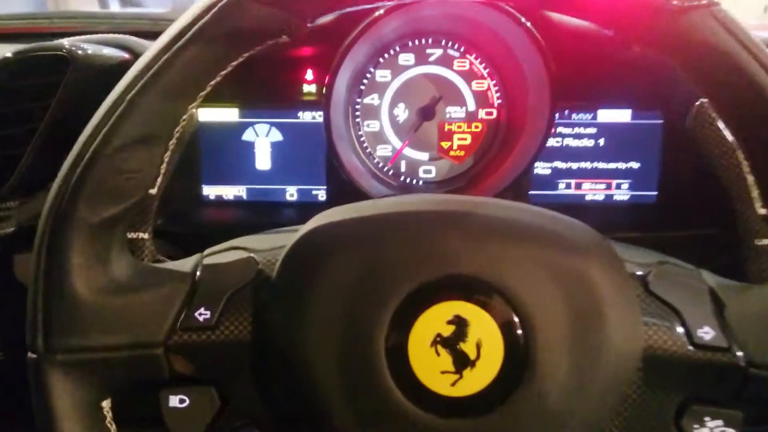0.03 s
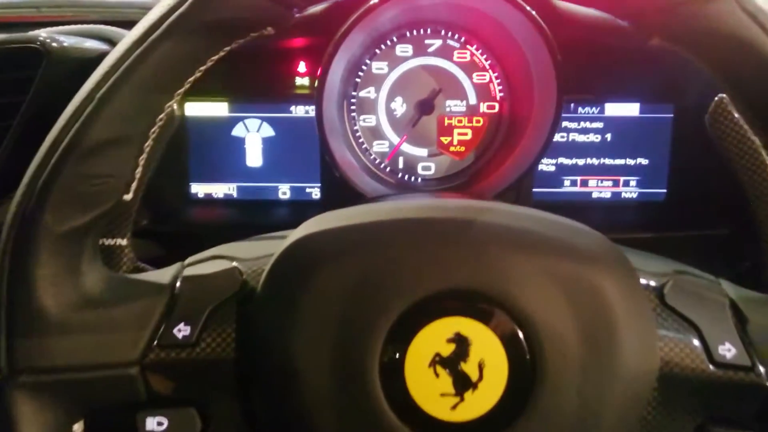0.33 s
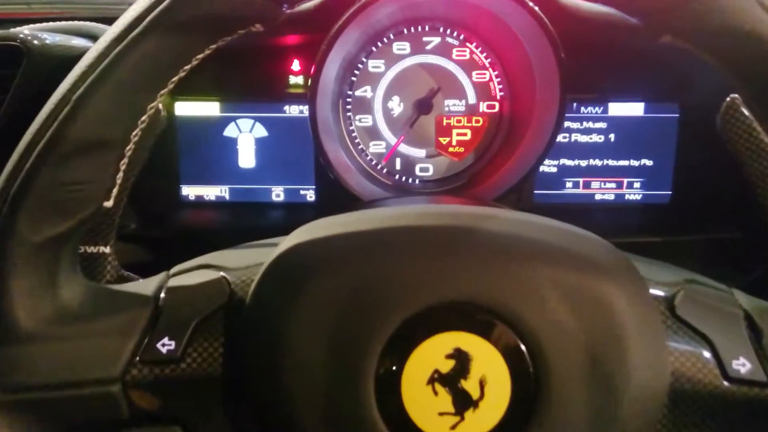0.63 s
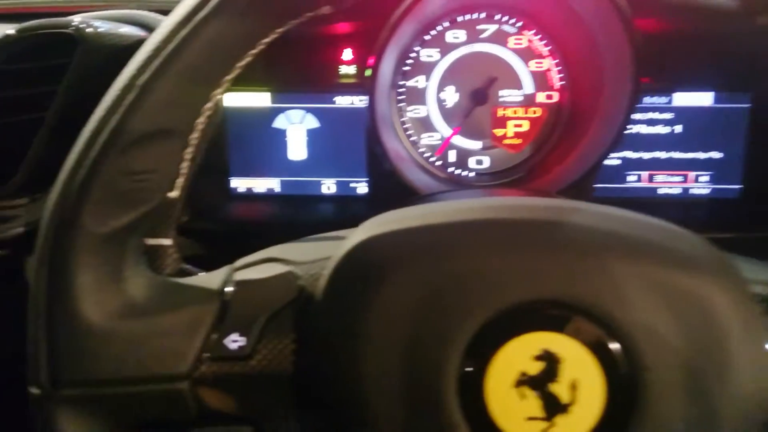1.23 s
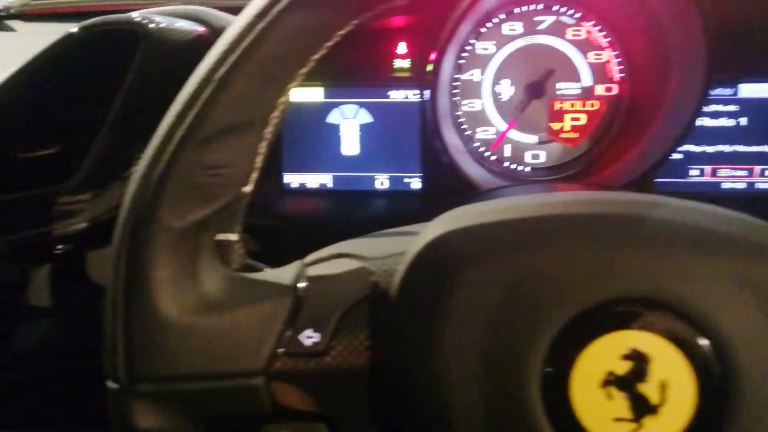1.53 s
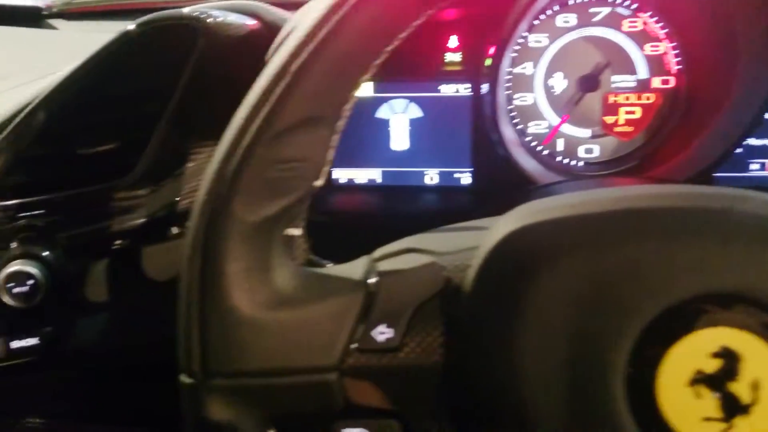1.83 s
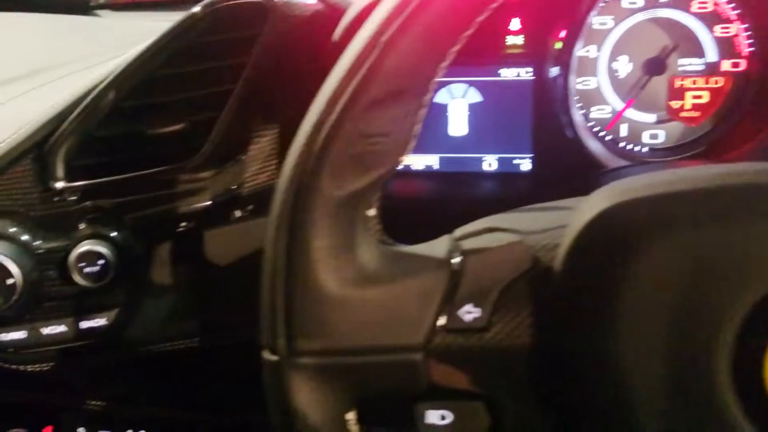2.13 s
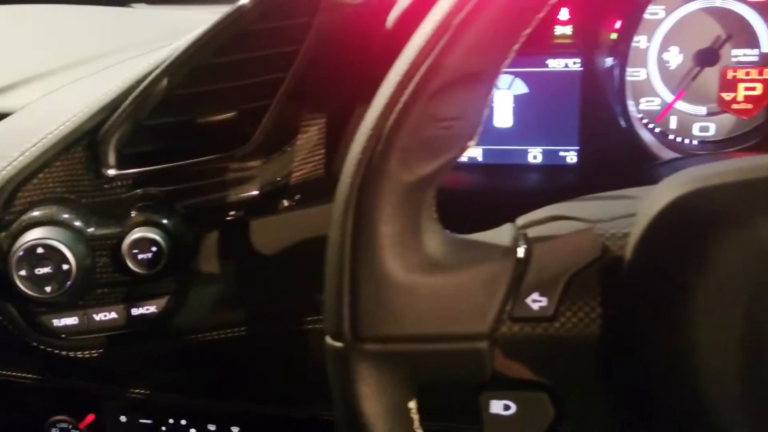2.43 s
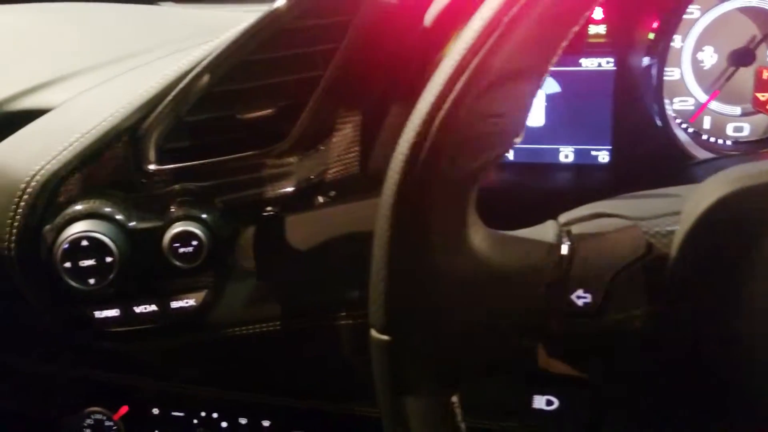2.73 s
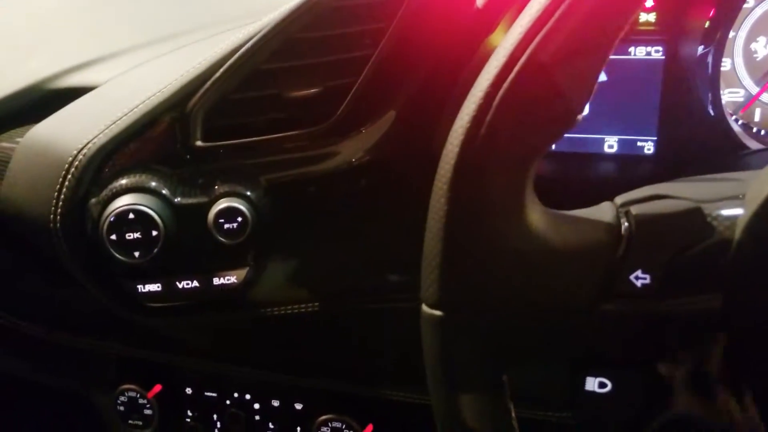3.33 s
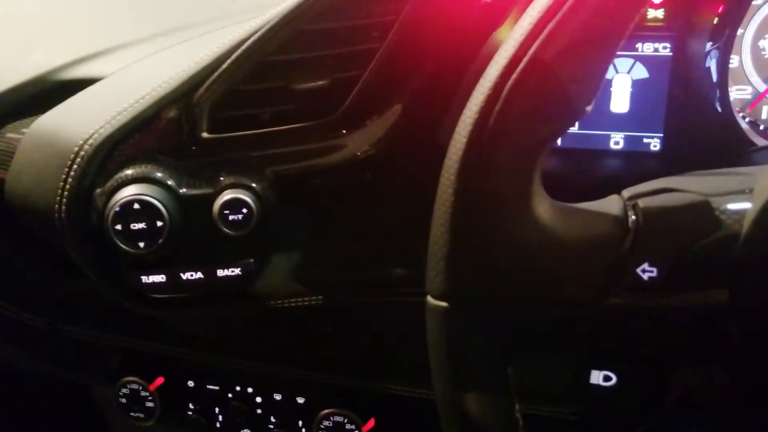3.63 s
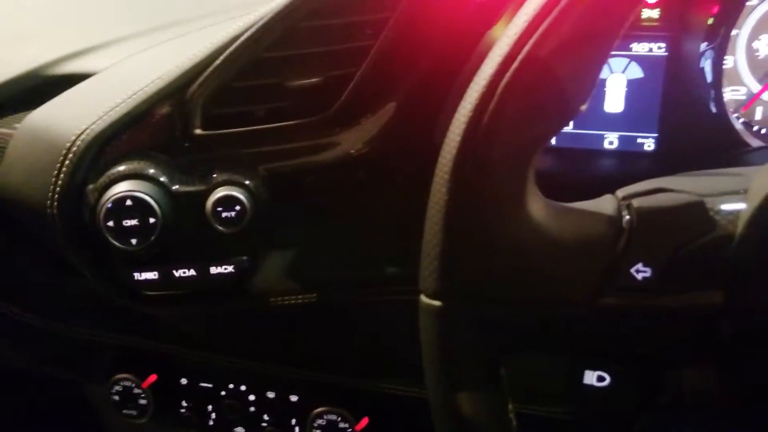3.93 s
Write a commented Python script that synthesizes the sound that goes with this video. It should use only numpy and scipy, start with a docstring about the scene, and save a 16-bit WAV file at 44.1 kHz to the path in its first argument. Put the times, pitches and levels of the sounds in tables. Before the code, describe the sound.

Deep engine idle inside a parked sports car, with ventilation hiss and faint handling noises.

```python
"""Inside a parked sports car. From the start its V8 idles with a deep, slightly unsteady boom, while
machinery whirrs and air hisses from the vents. Just past halfway the idle rises and settles with a deep
shudder, and something rustles, squeaks and ticks softly as the hand-held microphone turns. Near the end
the microphone takes a dull bump. Throughout, the engine's bass swings nearly opposite ways in the left
and right channels."""
import sys
import numpy as np
from scipy import signal
from scipy.fft import rfft, irfft
from scipy.io import wavfile

SR = 44100
rng = np.random.default_rng(int(sys.argv[2]) if len(sys.argv) > 2 else 0)


def unload_audio(sound):
    """Save the sound as a 16-bit wav file, at the path given as the first command line argument."""
    columns = np.transpose(np.atleast_2d(sound))
    # keep every value between -1 and 1, then stretch to whole-number steps
    steps = np.round(np.clip(columns, -1, 1) * 32767)
    wavfile.write(sys.argv[1], SR, steps.astype(np.int16))


N = 176400

# idle speed; the cabin booms more as it sinks: t/s, firing rate/Hz, boost of the firing tone/dB
IDLE_SPEED = [(0, 90.3, .8), (.37, 89.8, 1), (.5, 91.15, 0.5), (.65, 89.9, 1.6), (.95, 89.75, 1),
              (1.14, 91.4, 0.2), (1.37, 89.95, 0), (1.45, 91.46, -0.5), (1.74, 92, -3), (1.86, 89, -1.2),
              (2.03, 88.7, -0.8), (2.22, 89.4, -1.2), (2.44, 95.56, -7), (2.56, 91.57, -2.5),
              (2.66, 94.2, -4.9), (2.84, 92.55, -4), (2.97, 88.7, -2.2), (3.09, 90.5, -1.2),
              (3.23, 91.2, -3), (3.6, 89.35, -1.6), (3.77, 90.34, -1.8), (3.93, 89.2, -1), (4.0, 89.5, -2)]
# engine tones: multiple of the engine cycle, left base level/dB, right base level/dB
ENGINE_TONES = [(4, -33, -33), (5, -42, -42), (6, -40, -39), (8, -16, -12), (9, -41, -38), (10, -38, -35),
                (12, -44, -42), (13, -52, -49), (14, -38, -35.5), (17, -48, -45), (18, -41.5, -36),
                (20, -42.5, -37.5), (22, -49, -45.5), (23, -55, -52), (24, -45, -44), (26, -58, -55),
                (28, -42.5, -41), (30, -54, -48), (31, -53, -47.5), (32, -59, -47.5), (34, -50, -51),
                (36, -58, -49.5), (40, -62, -57), (48, -66, -54), (52, -69, -59)]
# the tone an octave above the firing tone: t/s, left level/dB, right level/dB
OCTAVE_LEVELS = [(0, -28.5, -38), (.4, -32, -45), (.55, -28, -34), (.7, -32, -32.5), (.93, -32.5, -28.5),
                 (1.08, -34, -52), (1.2, -27, -30), (1.4, -30, -39), (1.5, -28.5, -36),
                 (1.83, -26.5, -26.5), (1.92, -36, -31.5), (2.03, -22.5, -22), (2.2, -27.5, -27.5),
                 (2.28, -30, -37.5), (2.58, -33.5, -29.5), (2.8, -36, -54), (2.91, -29, -27),
                 (3.16, -33, -36), (3.28, -24, -24.5), (3.68, -31, -35.5), (3.9, -28.5, -28),
                 (4.0, -27, -27)]
# how far the left channel's bass is shifted against the right: f/Hz, phase/rad
BASS_PHASE = [(45, 3), (68, 3.05), (90, 2.713), (160, 2.77), (185, 2.806), (240, 2.53), (320, 2.55),
              (400, 2.41)]
# engine and body rumble: f/Hz, base level/dB per Hz
RUMBLE_SPECTRUM = [(10, -85), (30, -83), (52, -59), (75, -60), (125, -79), (190, -56), (280, -70.5),
                   (370, -66.5), (500, -78.5), (900, -105)]
# swells of deep shudder: t/s, half length/s, f/Hz, right level/dB
SHUDDER_SWELLS = [(2.45, .08, 48.3, -27), (2.78, 0.099, 53.2, -19), (2.95, 0.07, 43, -20)]
# soft rustles: t/s, half length/s, centre f/Hz, width/octaves, left base level/dB, right base level/dB
RUSTLE_STROKES = [(2.493, 0.024, 2800, 0.5, -55, -40), (2.82, 0.04, 2920, 0.5, -49, -40.5),
                  (2.888, 0.29, 2200, 0.52, -53, -38.5), (2.913, 0.2, 7460, 0.3, -49.5, -51),
                  (3.49, 0.08, 8390, 0.33, -45.5, -47), (3.54, 0.03, 13500, 0.25, -56, -51)]
# faint squeaks: t/s, half length/s, f/Hz, right base level/dB
SQUEAK_SLIPS = [(2.685, .014, 2870, -34.5), (2.715, 0.02, 2940, -35), (2.742, .018, 2870, -35),
                (2.805, .03, 2830, -41), (2.835, .018, 3370, -39), (2.84, .018, 2400, -37)]
# faint ticks: t/s, centre f/Hz, width/octaves, decay/s, right level/dB
TICK_HITS = [(1.056, 4370, .09, 0.0047, -29), (2.4455, 7498, .3, .0015, -32), (2.476, 3250, .1, .003, -29),
             (2.479, 2600, .3, .002, -25), (2.4826, 3100, 0.47, .002, -25),
             (2.4885, 4080, 0.16, .0015, -27.5), (2.492, 4020, .3, 0.0016, -26),
             (2.501, 3000, .3, 0.0033, -31), (2.975, 4000, .06, 0.0054, -29), (3.047, 4100, .25, .003, -28),
             (3.522, 3500, 0.36, .003, -28)]
# soft thuds of the hand: t/s, level/dB
HAND_THUDS = [(2.485, -31.5), (2.88, -39), (3.045, -40)]
# the machinery's two resonances: t/s, right whirr level/dB, right ring level/dB
MACHINE_LEVELS = [(0, -49, -54), (.6, -49.5, -46), (.85, -51, -48), (1.42, -44.5, -42.5), (1.7, -44.5, -50),
                  (2.05, -49, -45), (2.3, -47.5, -53), (3.08, -49, -45.5), (3.3, -52, -53), (4.0, -59, -47)]
# air from the vents: f/Hz, left base level/dB per Hz, right base level/dB per Hz
AIR_SPECTRUM = [(199, -95, -66.5), (533, -79, -72), (695, -79, -71.5), (1120, -81.5, -70.5),
                (1580, -82, -70.5), (2580, -84, -72.5), (3200, -85.5, -72), (3640, -83.5, -71),
                (4350, -81, -75), (4640, -78.5, -74), (6020, -77, -82), (7460, -83, -84.5),
                (9300, -80.5, -87.5), (10030, -85.5, -83), (11170, -98, -85.5), (14900, -111, -87.5)]
# pitches at which the air ducts ring: f/Hz, width/Hz, left boost/dB, right boost/dB
DUCT_PEAKS = [(874, 154, 3.5, 3), (1290, 63, 3.5, 4), (1864, 79, 0.5, 4), (2136, 170, 0, 3.5),
              (2740, 57, 5, 2), (14680, 60, 0, 1)]
# faint whistles: t/s, half length/s, f/Hz, width/Hz, right level/dB
WHISTLE_SWELLS = [(0.195, 0.24, 1380, 71.2, -45.5), (0.6, 1.0, 570.6, 80, -51),
                  (3.94, 0.095, 1291, 45.2, -44)]

CYLINDERS = 8
SPEED_JITTER, BOOM_WAVER_DB, TONE_WAVER, WAVER_HZ = .002, 0.37, 0.185, 4.4
# overtones and rumble weaken as the microphone turns away
OVERTONE_START_DB, OVERTONE_FADE_DB_PER_S, RUMBLE_FADE_DB_PER_S = 1, 0.57, 0.4
RUMBLE_APART, RUMBLE_APART_HZ = 0.51, 198  # the channels grow less alike as the pitch goes up
BUMP_AT_S, BUMP_SAG_S, BUMP_PEAK_S = 3.942, 0.0051, 0.008
BUMP_START_HZ, BUMP_END_HZ, BUMP_GAIN = 190, 60, 0.63
AIR_SHARED, AIR_LEFT_LEAD_S = 0.17, 0.000556  # a little air noise reaches both channels, the left first
CABIN_RIPPLE_DB, CABIN_RIPPLE_HZ = 1.63, 30.07  # size and spacing of the cabin's random peaks and dips


def engine():
    """Firing cylinders make a deep tone and its octave; their unevenness adds weaker, wavering tones."""
    firing_hz, boom_db = curves(IDLE_SPEED)
    unsteady_hz = firing_hz * (1 + SPEED_JITTER * drift(rate_hz=17.5).real)
    cycle_angle = 2 * np.pi * np.cumsum(unsteady_hz) / SR / CYLINDERS  # each cylinder fires once a cycle
    boom = amp(boom_db + BOOM_WAVER_DB * drift(WAVER_HZ).real)
    main_gains = {CYLINDERS: boom, 2 * CYLINDERS: 1}
    overtone_fade = amp(OVERTONE_START_DB - OVERTONE_FADE_DB_PER_S * clock())
    octave = (2 * CYLINDERS, *curves(OCTAVE_LEVELS))
    out = np.zeros((2, N))
    for multiple, left_db, right_db in ENGINE_TONES + [octave]:
        waver = 1 + TONE_WAVER * drift(WAVER_HZ).real
        gain = main_gains.get(multiple, overtone_fade * waver)
        tone = np.sqrt(2) * gain * np.exp(1j * (multiple * cycle_angle + 2 * np.pi * rng.random()))
        left = tone * left_shift(multiple * firing_hz.mean() / CYLINDERS)
        out += [amp(left_db) * left.real, amp(right_db) * tone.real]
    return out


def rumble(left_db=-3.5):
    """Uneven low engine noise fills the cabin; both channels share its deepest part."""
    shared, own = rfft(rng.standard_normal((2, N))) * density(*np.transpose(RUMBLE_SPECTRUM))
    apart = np.clip(RUMBLE_APART * (bins() / RUMBLE_APART_HZ) ** 2, 0, 1)
    left = amp(left_db) * (np.sqrt(1 - apart ** 2) * shared * left_shift(bins()) + apart * own)
    fade = amp(RUMBLE_FADE_DB_PER_S * (clock().mean() - clock()))
    return irfft(np.array([left, shared]), N) * fade


def shudder(left_db=-2):
    """Deep swells while the idle rises and settles, swinging opposite ways left and right."""
    swells = sum(swell(*row) for row in SHUDDER_SWELLS)
    return np.array([-amp(left_db) * swells, swells])


def bump(right_db=-19):
    """A dull knock beside the left microphone; its pitch drops as the push relaxes."""
    age = np.maximum(clock() - BUMP_AT_S, 0)
    hz = BUMP_END_HZ + (BUMP_START_HZ - BUMP_END_HZ) * np.exp(-age / BUMP_SAG_S)
    push = age / BUMP_PEAK_S * np.exp(1 - age / BUMP_PEAK_S)
    knock = -BUMP_GAIN * push * np.sin(2 * np.pi * np.cumsum(hz * (age > 0)) / SR)
    return np.array([knock, amp(right_db) * knock])


def rustles(grain_db=2.2):
    """Grainy brushing sounds that swell and fade."""
    out = np.zeros((2, N))
    grain = amp(grain_db * drift(rate_hz=600).real)
    for at_s, half_s, hz, octaves, *sides_db in RUSTLE_STROKES:
        stroke = hump(at_s, half_s) * grain
        out += [amp(db) * stroke * band(hz, octaves) for db in sides_db]
    return out


def squeaks(pitch_jitter=.01, rough_db=3, left_db=-13):
    """Something sticks and slips under the hand, making short, slightly rough tones."""
    out = np.zeros(N)
    for at_s, half_s, hz, db in SQUEAK_SLIPS:
        slip = drift(rate_hz=180)
        cycles = np.cumsum(hz * (1 + pitch_jitter * slip.real)) / SR
        out += amp(db + rough_db * slip.imag) * hump(at_s, half_s) * np.sin(2 * np.pi * cycles)
    return np.array([amp(left_db) * out, out])


def ticks(left_db=-11):
    """Tiny ticks, some dry and some briefly ringing, that die within milliseconds."""
    out = np.zeros((2, N))
    for at_s, hz, octaves, decay_s, db in TICK_HITS:
        age = clock() - at_s
        fade = amp(db) * (age > 0) * np.exp(-abs(age) / decay_s)
        out += [amp(left_db) * fade * band(hz, octaves), fade * band(hz, octaves)]
    return out


def thuds():
    """Muffled nudges of the hand, the same in both channels."""
    return sum(swell(at_s, half_s=0.042, hz=191, db=db) for at_s, db in HAND_THUDS)


def machinery(left_db=-9.5):
    """Running machinery makes a mid-pitched whirr and a thin metallic ring, each swelling and fading."""
    whirr_db, ring_db = curves(MACHINE_LEVELS)
    out = []
    for side_db in (left_db, 0):
        whirr = amp(whirr_db) * fuzzy_tone(hz=838.5, width_hz=53)
        ring = amp(ring_db) * fuzzy_tone(hz=3410, width_hz=79)
        out.append(amp(side_db) * (whirr + ring))
    return np.array(out)


def vents(flutter_db=0.61):
    """Swirling air hisses; the ducts and the cabin make some pitches louder than others."""
    hz, *sides_db = np.transpose(AIR_SPECTRUM)
    shared, *own = rfft(rng.standard_normal((3, N)))
    ripple_hz = np.arange(4096) * CABIN_RIPPLE_HZ
    out = []
    for side, (db, lead_s) in enumerate(zip(sides_db, (AIR_LEFT_LEAD_S, 0))):
        ducts_db = sum(boosts[side] * np.exp(-((bins() - f) / width) ** 2)
                       for f, width, *boosts in DUCT_PEAKS)
        ripple_db = CABIN_RIPPLE_DB * np.interp(bins(), ripple_hz, rng.standard_normal(len(ripple_hz)))
        arriving = shared * np.exp(2j * np.pi * bins() * lead_s)
        air = np.sqrt(AIR_SHARED) * arriving + np.sqrt(1 - AIR_SHARED) * own[side]
        out.append(irfft(air * density(hz, db) * amp(ducts_db + ripple_db), N))
    return np.array(out) * amp(flutter_db * drift(rate_hz=25).real)


def whistles(left_db=-14):
    """Faint, fuzzy tones that rise out of the hiss and sink back."""
    out = np.zeros(N)
    for at_s, half_s, hz, width_hz, db in WHISTLE_SWELLS:
        tone = drift(width_hz) * np.exp(2j * np.pi * (hz - width_hz / 2) * clock())
        out += amp(db) * hump(at_s, half_s) * tone.real
    return np.array([amp(left_db) * out, out])


def amp(db):
    """Turns decibels into a gain to multiply by."""
    return 10 ** (np.asarray(db) / 20)


def clock():
    """The time of every sample in seconds."""
    return np.arange(N) / SR


def bins():
    """The frequency of every slot in the spectrum, in Hz."""
    return np.fft.rfftfreq(N, 1 / SR) + 1e-3


def curves(table):
    """Joins a table's points in time with straight lines, one curve for each value column."""
    times, *columns = np.transpose(table)
    return [np.interp(clock(), times, column) for column in columns]


def hump(at_s, half_s):
    """A smooth rise and fall that reaches 1 at at_s."""
    return np.exp(-((clock() - at_s) / half_s) ** 2)


def swell(at_s, half_s, hz, db):
    """A low tone that swells and fades."""
    return amp(db) * hump(at_s, half_s) * np.sin(2 * np.pi * (hz * clock() + rng.random()))


def left_shift(hz):
    """Shifts the left channel's wave by nearly half a cycle against the right."""
    return np.exp(1j * np.interp(hz, *np.transpose(BASS_PHASE)))


def density(hz, db):
    """The gains that give white noise these levels per Hz."""
    return amp(np.interp(np.log(bins()), np.log(hz), db)) * np.sqrt(SR / 2)


def noise(gain):
    """Noise with the given gain at each frequency, as complex numbers."""
    return signal.hilbert(irfft(rfft(rng.standard_normal(N)) * gain, N))


def drift(rate_hz):
    """A random wobble up to about rate_hz; its real and imaginary parts have a typical size (rms) of 1."""
    wobble = noise(np.exp(-(bins() / rate_hz) ** 2))
    return wobble / wobble.real.std()


def band(centre_hz, octaves):
    """Hiss around one pitch, with a typical size of 1."""
    hiss = noise(np.exp(-.5 * (np.log2(bins() / centre_hz) / octaves) ** 2)).real
    return hiss / hiss.std()


def fuzzy_tone(hz, width_hz):
    """Noise so narrow that it rings like a tone, with a typical size of 1."""
    tone = noise(np.exp(-((bins() - hz) / width_hz) ** 2)).real
    return tone / tone.std()


def scene():
    """Adds up the engine, the air and the small handling sounds as left and right channels."""
    car = engine() + machinery() + rumble() + shudder() + vents() + whistles()
    return car + rustles() + squeaks() + ticks() + thuds() + bump()


def record(dry):
    """Cuts off the very highest treble."""
    cutoff_hz = 15500
    low_pass = signal.firwin(511, cutoff_hz, window=("kaiser", 9), fs=SR)
    return signal.oaconvolve(dry, low_pass[None], "same")


dry = scene()
out = record(dry)
unload_audio(out)
```